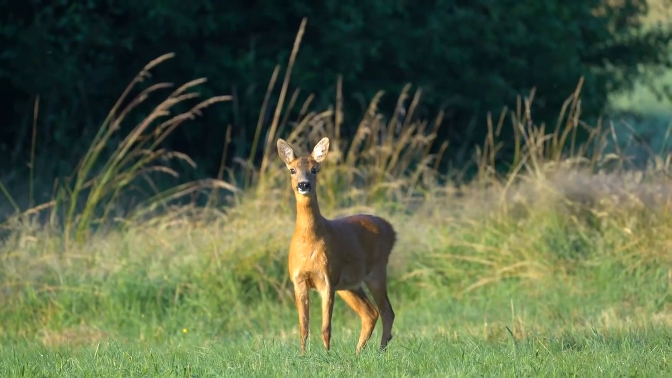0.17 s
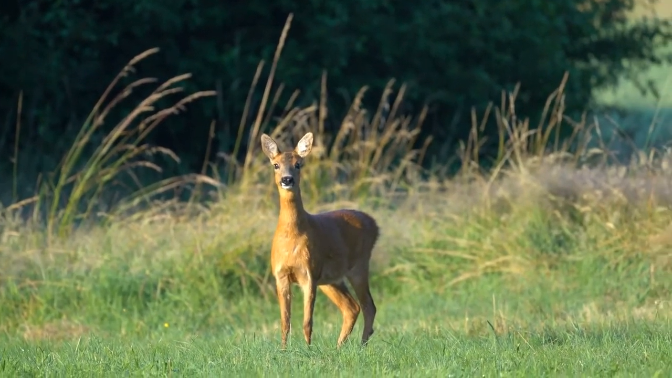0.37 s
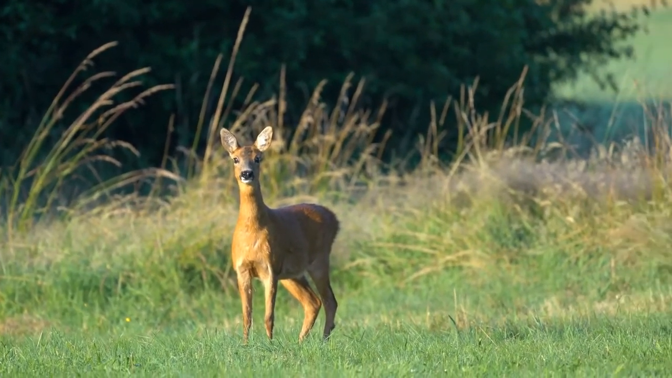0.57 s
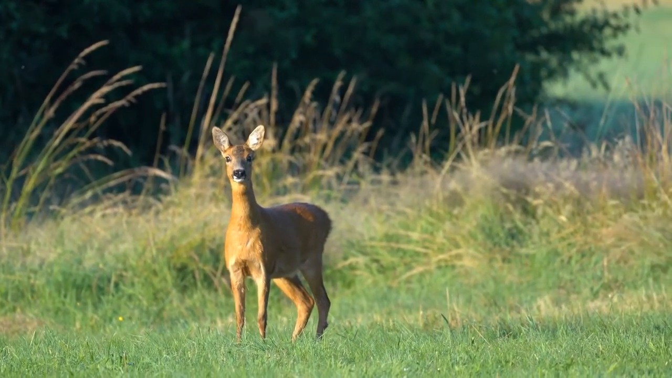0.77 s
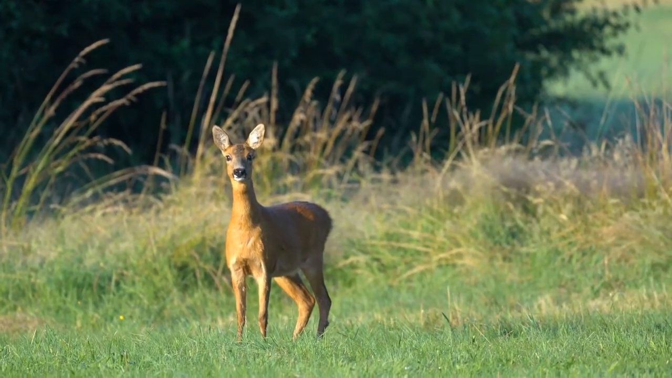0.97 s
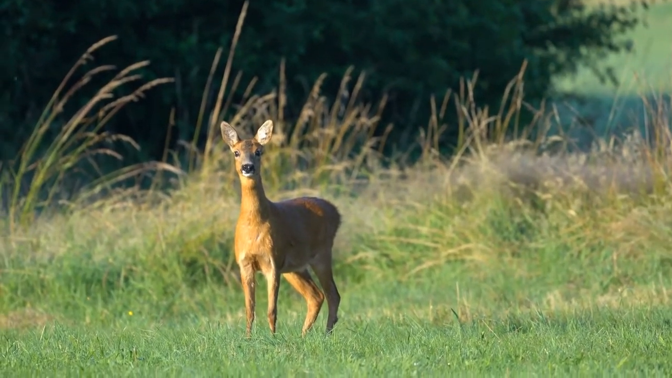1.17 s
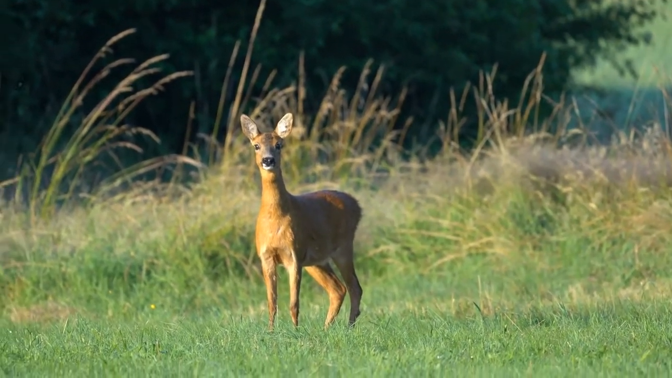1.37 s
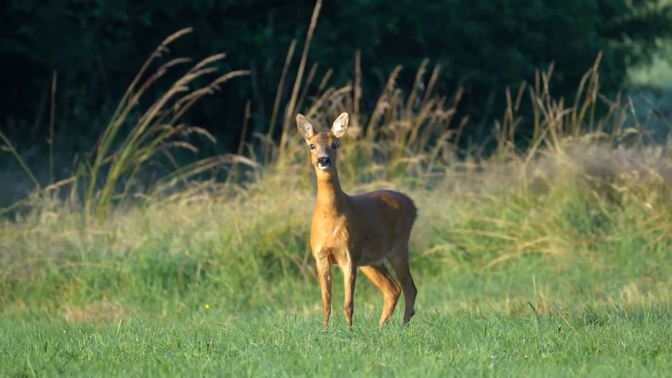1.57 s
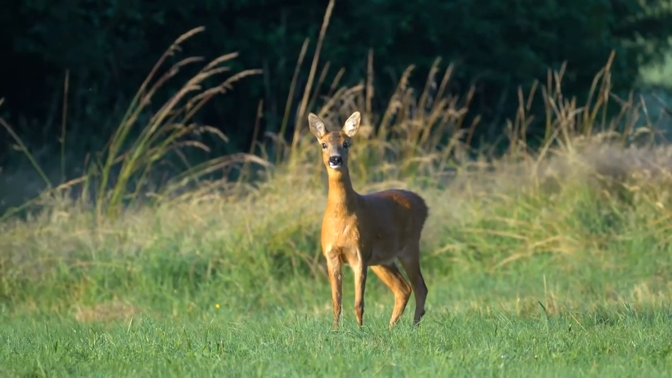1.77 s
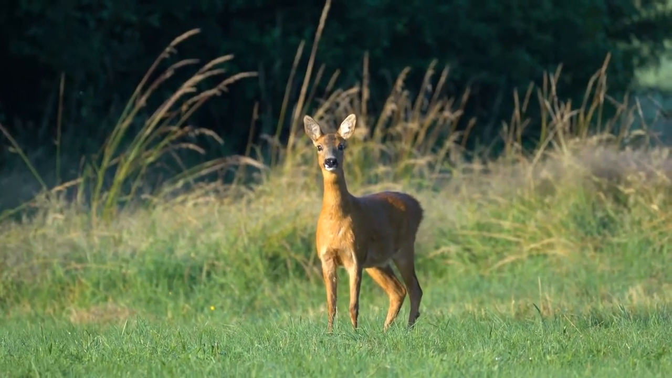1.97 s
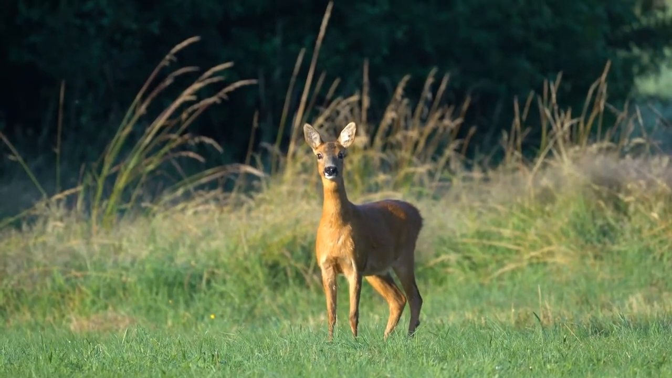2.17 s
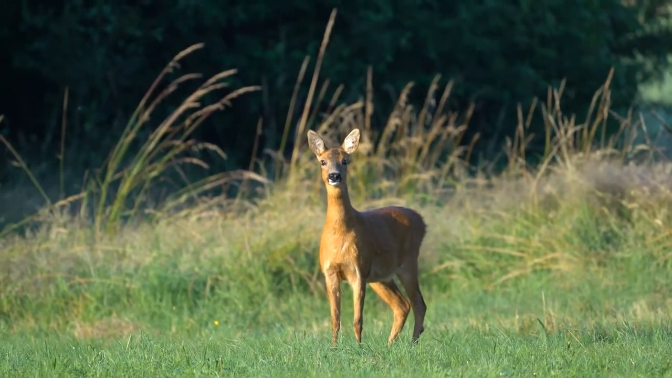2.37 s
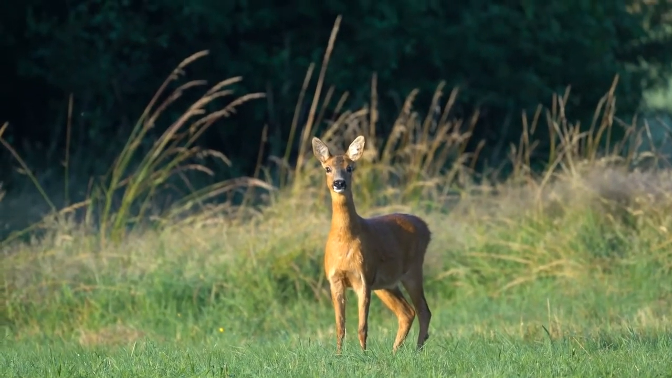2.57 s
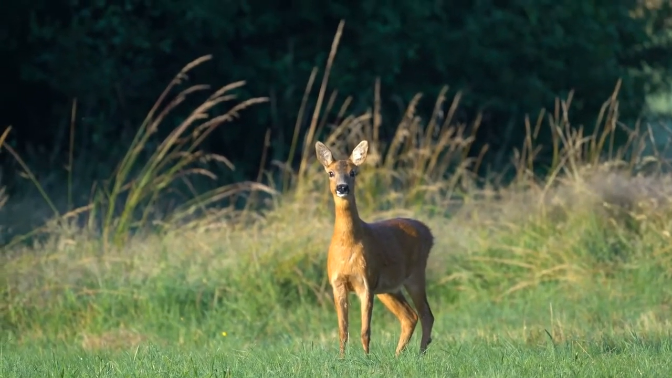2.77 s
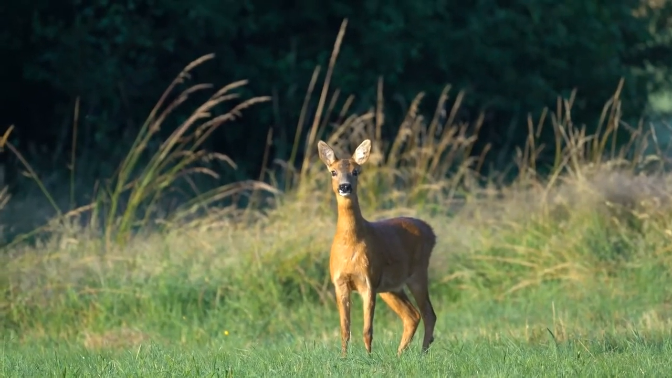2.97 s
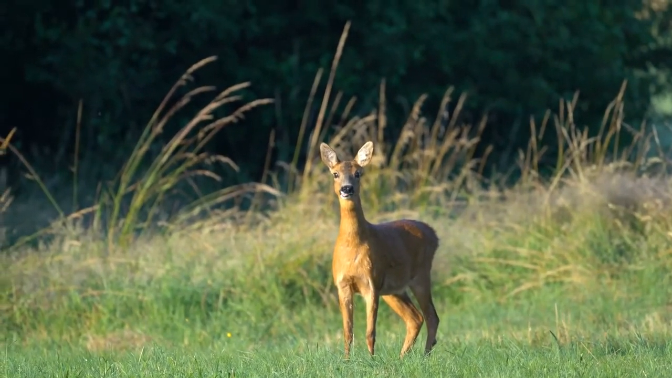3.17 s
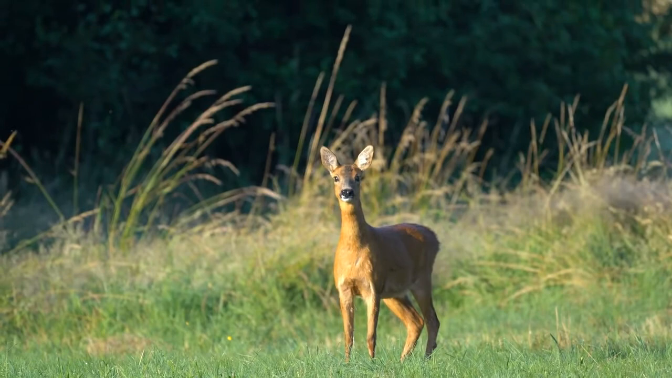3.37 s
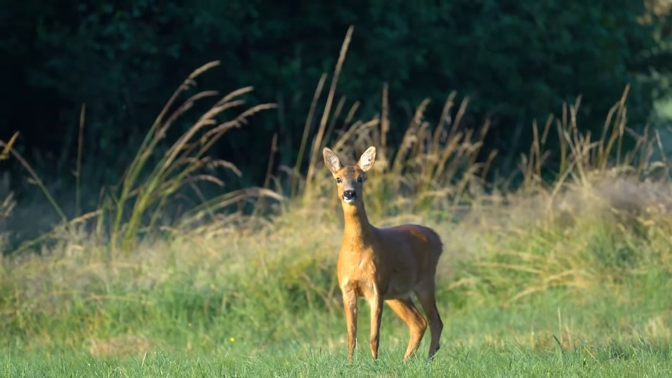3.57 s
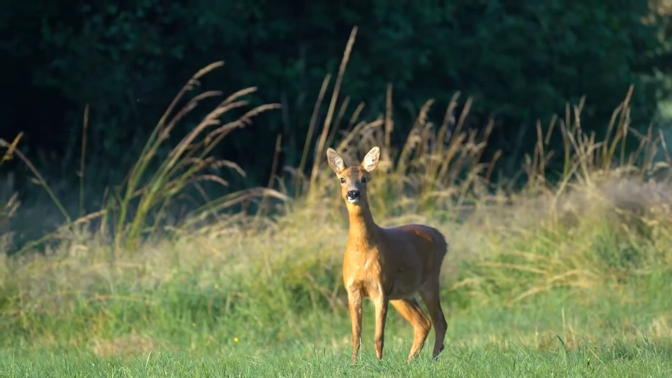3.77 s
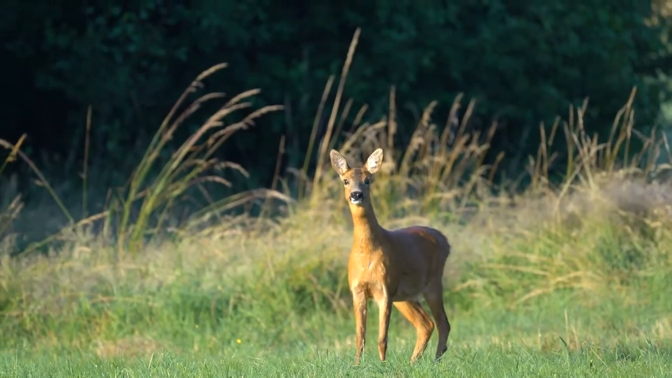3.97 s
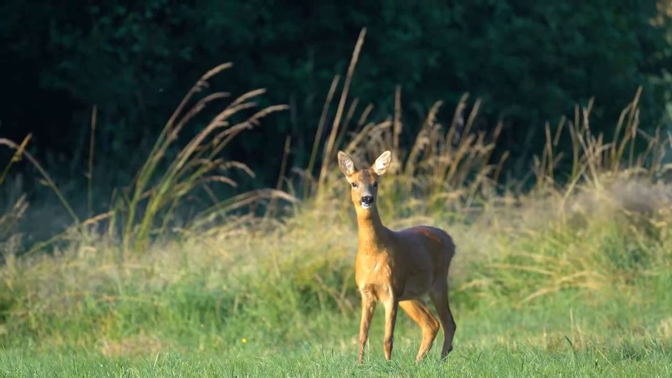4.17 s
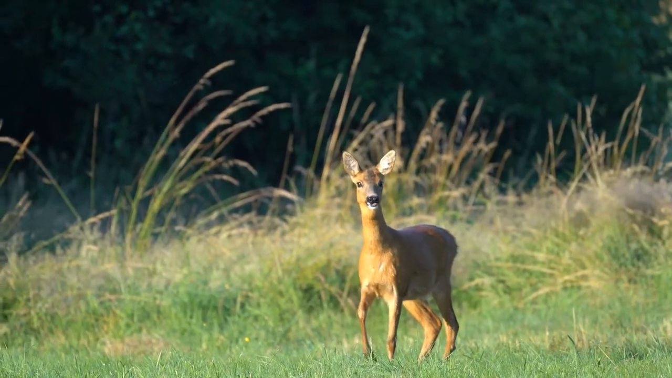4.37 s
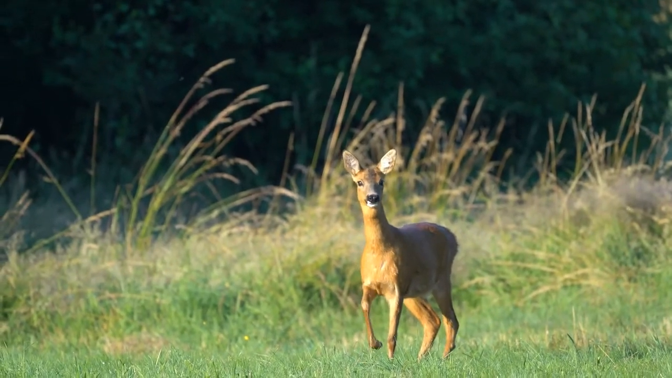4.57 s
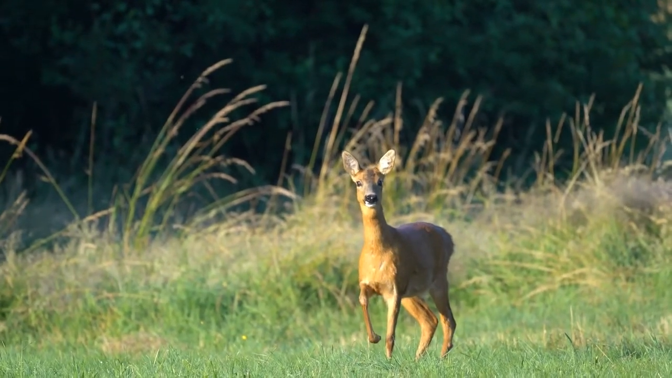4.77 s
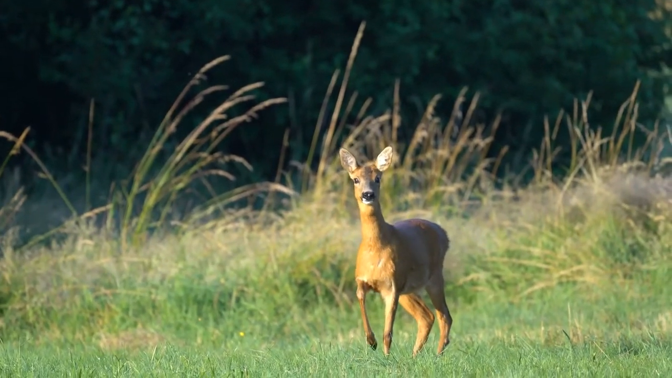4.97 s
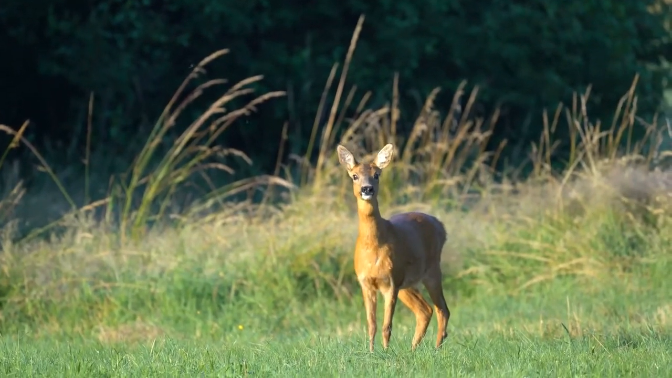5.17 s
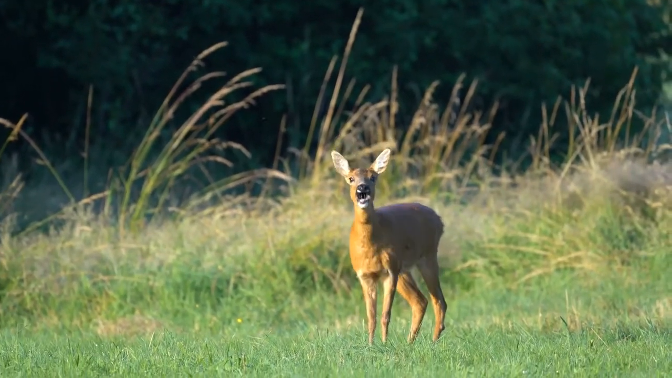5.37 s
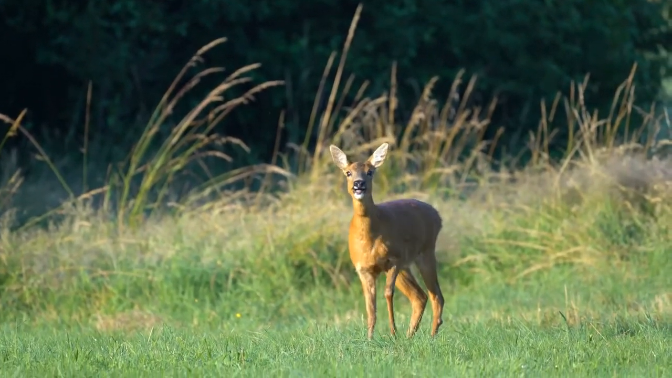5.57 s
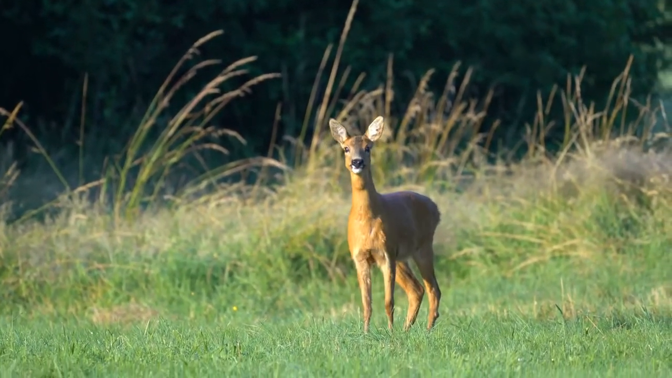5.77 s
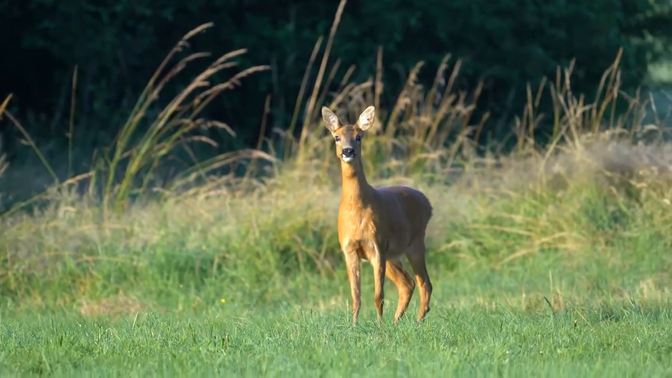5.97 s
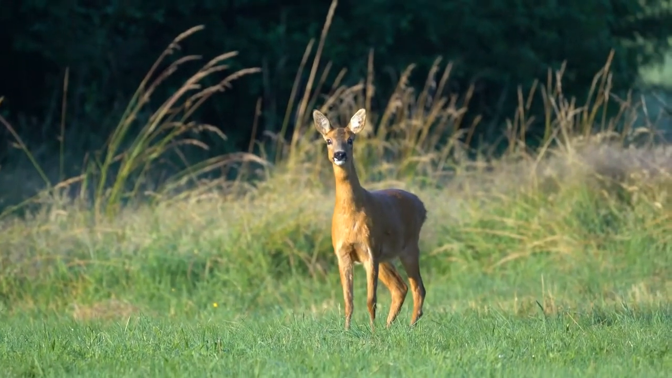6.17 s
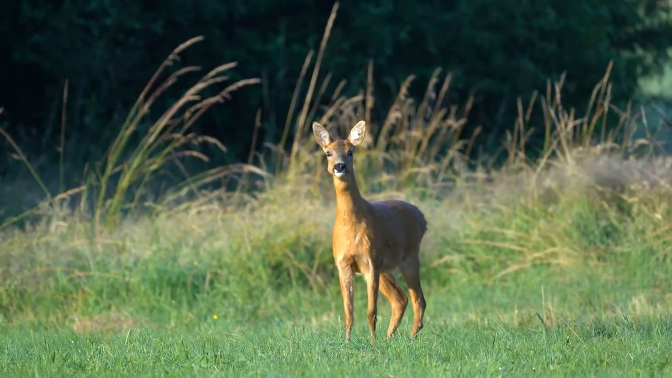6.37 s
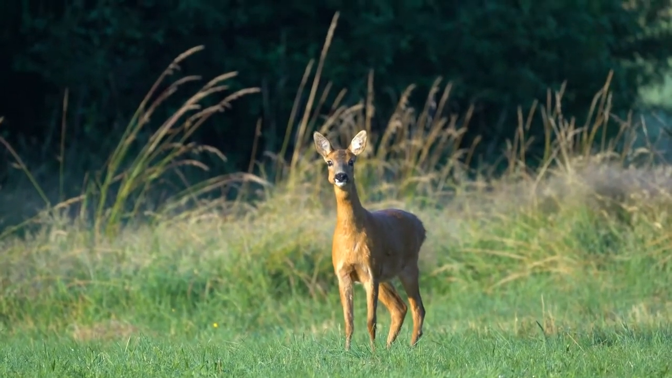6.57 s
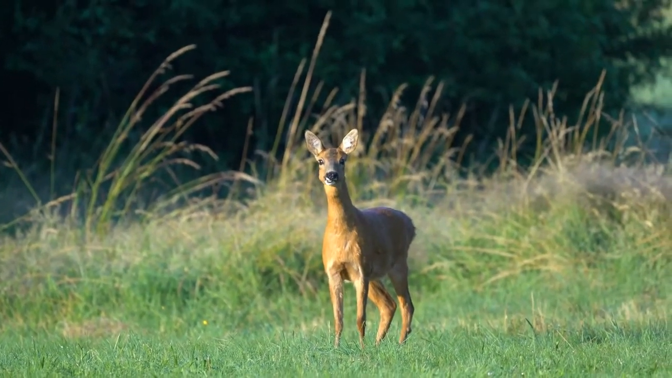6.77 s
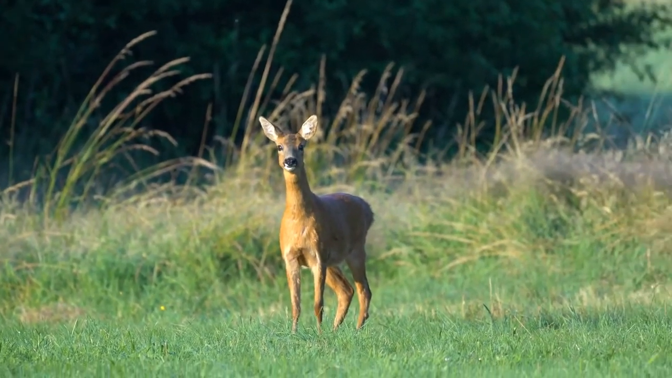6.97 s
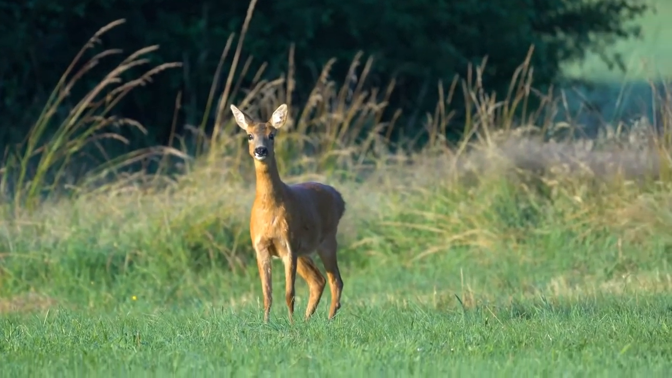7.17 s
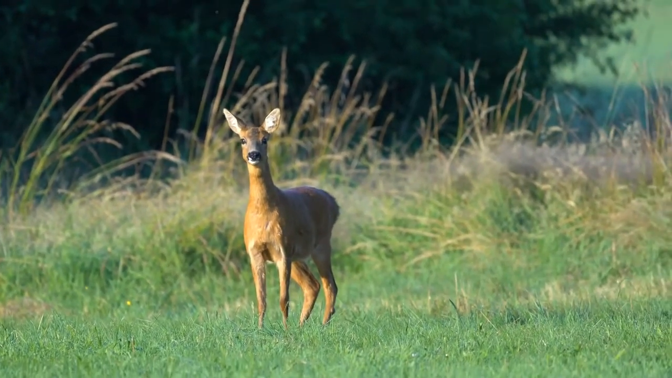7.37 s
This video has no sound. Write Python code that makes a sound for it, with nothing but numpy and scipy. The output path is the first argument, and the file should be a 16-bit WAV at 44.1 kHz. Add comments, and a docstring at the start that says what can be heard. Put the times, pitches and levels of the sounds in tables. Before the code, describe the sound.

Outdoor stereo ambience, very low in level: gentle hush, hiss and small scattered bird whistles from both sides, gathering into a faint twitter before falling nearly silent. Past the middle, one loud, hoarse deer bark, about a quarter second long, bursts out at moderate distance, followed by a hazy woodland reverberation. Brief bird peeps return, and a bright plastic click sounds near the microphone close to the end.

```python
"""Distant songbirds warble and chirp harshly over a soft rural hush, then a roe deer barks once in the meadow.
The bark is a train of uneven fold pulses and rasping air, coloured by throat resonances.
The tree line returns it as decaying scattered noise for about a second.
Songbirds are gliding sines; a far dove-like tone is a wavering sine and a far hum is resonant noise.
Ticks close to the microphone are clicks ringing a small plastic body."""
import sys
import numpy as np
from scipy import signal
from scipy.io import wavfile

SR = 44100
rng = np.random.default_rng(int(sys.argv[2]) if len(sys.argv) > 2 else 0)


def dump_mix(stems):
    """Bounce the given channels to the path in sys.argv[1] as a 16-bit WAV at rate SR."""
    frames = np.atleast_2d(stems).T  # one column per channel
    limited = np.clip(frames, -1, 1)  # hard clip at full scale
    pcm = np.round(limited * 32767).astype(np.int16)
    wavfile.write(sys.argv[1], SR, pcm)


N = 326781

# Hush of the meadow. Each row: time in seconds, level of the lower hush in dB, level of the upper hush in dB.
HUSH_LEVELS = [(0, -71.5, -75), (.5, -70.5, -69.5), (2.1, -69, -69), (2.5, -65.5, -65), (2.8, -70, -66),
               (3.8, -68, -66), (4.6, -69, -72.5), (4.8, -70, -71), (5.5, -69, -71.5), (6.5, -68.5, -68.5),
               (7.41, -66.5, -71.5)]
# Spectral shapes of the lower hush, the upper hush and the microphone's own hiss.
# Each row: frequency in Hz, relative density in dB per Hz.
HUSH_LOW = [(15, -54), (25, -32), (70, -14), (182, -15), (439, -5), (492, -3), (840, -4.5), (1040, -3.5),
            (1140, -3), (2400, -8.5), (3120, -16), (5280, -120)]
HUSH_HIGH = [(1120, -47), (1900, -4.5), (2820, 4), (5600, -6.5), (7280, -21), (12300, -120)]
HISS_SPECTRUM = [(3290, -24), (5600, -3), (7010, -1.5), (12800, -3.5), (15700, -3.5)]
HISS_DB = -67.5
# Stereo coherence of hush and hiss. Each row: frequency in Hz, left-right likeness (a correlation).
HUSH_LIKENESS = [(60, .9), (130, 0.63), (290, 0.77), (640, 0.26), (1100, 0.066), (3100, -0.45), (5000, 0.1),
                 (6300, 1)]

# A narrow band of far hum; the width is that of each of two passes through the resonance.
DRONE_HZ, DRONE_WIDTH_HZ, DRONE_DB = 1029.4, 42, -81
# The far low tone. Each row: time in seconds, frequency in Hz, level in dB.
COO = [(0.0, 504.3, -90), (1.41, 491.5, -73), (2.35, 494, -91.5), (3.35, 473.7, -73.5), (5.4, 474, -84.5)]

# Ticks near the microphone. Each row: start in seconds, peak in dB, treble over body in dB,
# left minus right in dB.
TICKS = [(0.427, -52, -10, 13), (1.866, -48, -6, -7), (2.023, -49, 3, -7.0), (2.145, -49, 7, -10),
         (2.186, -49, -3, 19), (2.236, -48.5, -1, -13), (3.005, -41, 13, 8), (6.9973, -28, 4, 2),
         (7.316, -46, -10, -8)]
# Resonances of the small body and of its sharp edge. Each row: frequency in Hz, t60 in seconds, level in dB.
TICK_BODY = [(1060, .012, -1), (1930, 0.0098, 12.5), (3300, 0.0031, 10)]
TICK_EDGE = [(5400, 0.0033, -4), (7150, 0.0027, -8), (9460, 0.0024, -8), (12900, 0.0015, -12)]

# Whistled notes. Each row: perch, start in seconds, length in seconds, start, middle and end frequency in Hz,
# level in dB.
NOTES = [("ahead", 0.536, 0.04, 4700, 4300, 2850, -62), ("ahead", 0.568, 0.025, 2850, 2700, 2500, -59),
         ("ahead", 0.706, 0.005, 2700, 2100, 1650, -61), ("left", 0.808, 0.06, 3250, 3330, 3600, -63),
         ("ahead", 1.036, 0.045, 3640, 3740, 3760, -60.5), ("right", 1.522, 0.079, 2510, 2540, 2430, -66),
         ("right", 1.641, 0.043, 2140, 2043, 1900, -65.5), ("left", 1.837, 0.013, 4600, 5400, 6400, -60),
         ("left", 1.857, 0.026, 4600, 4960, 4710, -50), ("right", 1.948, 0.054, 3150, 3300, 3540, -66),
         ("right", 2.003, 0.08, 2500, 2776, 2160, -54), ("left", 2.09, 0.055, 3750, 3600, 3480, -62),
         ("right", 2.157, 0.028, 2250, 2330, 2480, -62.5), ("right", 2.196, 0.035, 2180, 2490, 2570, -60),
         ("right", 2.284, 0.022, 2820, 2710, 2300, -56), ("right", 2.307, 0.033, 2430, 2170, 2140, -61.5),
         ("right", 2.46, 0.068, 2320, 2640, 2740, -58), ("left", 2.505, 0.028, 3400, 3600, 3800, -65),
         ("left", 2.538, 0.018, 3590, 3640, 3600, -61), ("right", 2.569, 0.04, 2750, 2130, 2070, -62.5),
         ("left", 2.59, 0.06, 4450, 3980, 3700, -64), ("left", 2.69, 0.028, 3800, 3650, 3500, -66),
         ("ahead", 2.61, 0.036, 8400, 8150, 7950, -67), ("right", 2.735, 0.06, 5300, 5950, 5750, -60),
         ("ahead", 2.747, 0.074, 5000, 5030, 4600, -60), ("right", 2.749, 0.111, 4450, 4070, 3650, -65),
         ("ahead", 2.855, 0.035, 3480, 3330, 3200, -60), ("left", 2.895, 0.075, 3250, 3640, 3450, -61),
         ("ahead", 3.018, 0.045, 3800, 3950, 3750, -57), ("right", 3.025, 0.05, 3900, 3100, 2600, -58),
         ("right", 3.112, 0.016, 2960, 2690, 2300, -60), ("right", 3.152, 0.0312, 2130, 2780, 3500, -56.5),
         ("ahead", 3.217, 0.028, 4010, 3800, 3660, -59), ("right", 3.24, 0.044, 2120, 1950, 1850, -68.5),
         ("right", 3.274, 0.047, 3190, 3250, 3500, -66), ("right", 3.381, 0.033, 3300, 3740, 3800, -67),
         ("left", 3.442, 0.02, 4870, 4840, 4740, -68), ("right", 3.412, 0.07, 1850, 2100, 2050, -65.5),
         ("right", 3.53, 0.023, 2900, 2670, 2350, -58.5), ("right", 3.55, 0.09, 1960, 1950, 1800, -69),
         ("ahead", 3.645, 0.038, 3720, 3200, 2650, -60.5), ("right", 3.651, 0.056, 2410, 2420, 2430, -65),
         ("right", 3.744, 0.048, 3560, 3530, 3520, -68), ("right", 4.23, 0.17, 1800, 2100, 2130, -69),
         ("right", 4.465, 0.12, 2500, 2300, 2000, -69), ("right", 4.262, 0.13, 2340, 2380, 2480, -67.5),
         ("left", 4.543, 0.089, 3320, 3000, 2980, -64.5), ("left", 4.748, 0.088, 3210, 2870, 2740, -64),
         ("ahead", 4.952, 0.025, 3750, 3600, 3300, -63), ("ahead", 5.25, 0.072, 3180, 3140, 3050, -61.5),
         ("left", 5.335, 0.022, 3450, 3500, 3500, -69), ("hedge", 6.152, 0.025, 2900, 2700, 2900, -59),
         ("near", 6.242, 0.024, 4450, 4700, 5900, -60), ("near", 6.267, 0.02, 5900, 5200, 4200, -53),
         ("left", 6.338, 0.006, 5100, 4850, 4600, -50), ("near", 6.485, 0.024, 5250, 5500, 5800, -60),
         ("near", 6.69, 0.012, 5150, 5000, 4750, -61), ]
# Where the songbirds sit. Each entry: perch, left minus right in dB.
PERCH_PAN_DB = {"left": 9, "ahead": 3, "right": -11, "near": 0, "hedge": -9}
# How strongly each singer's notes flutter. Each entry: perch, roughness factor.
PERCH_ROUGHNESS = {"left": 1, "ahead": 1.1, "right": 1.5, "near": 3.5, "hedge": 6}
# Harsh chirps. Each row: start in seconds, length in seconds, centre in Hz, level in dB.
CHIRPS = [(0.44, 0.047, 5520, -67), (0.64, 0.039, 4790, -62.5), (0.639, 0.023, 2020, -61),
          (0.748, 0.055, 4960, -60.5), (0.807, 0.039, 1980, -64), (1.129, 0.052, 5710, -64),
          (1.812, 0.042, 5300, -62.5), (3.69, 0.12, 7000, -67), (4.33, 0.22, 7000, -72),
          (6.352, 0.026, 5300, -55), (6.7, 0.022, 5300, -62)]
# The swing share scales the uneven whip of the pitch, relative to its centre.
CHIRP_SWEEPS_HZ, CHIRP_SWING_SHARE, CHIRP_SCRATCH_DB, CHIRP_PAN_DB = 68.75, .19, 5, -1
# Fainter warblers too far to follow. Each row: time in seconds, notes per second.
CHATTER_RATE = [(0, 2), (1.2, 8), (1.9, 16), (3.4, 42), (3.9, 25), (4.2, 3)]
CHATTER_DB = -74.5
LEAF_ECHO_DB, LEAF_T60_S = -6.5, .13
PORT_LAG_S = .00016  # birdsong reaches the left microphone port this much later

# The tree line's answer. Each row: frequency in Hz, level in dB.
WOODS_LEVEL = [(480, 4), (620, 13), (760, 8.5), (950, 10), (1380, 5.5), (1950, 1.5), (3000, 1), (6000, 2)]
# Its decay. Each row: frequency in Hz, t60 in seconds.
WOODS_T60 = [(700, 1.31), (1100, 1.1), (1340, 1.3), (1600, 0.75), (1950, .9), (3500, 0.5)]
# Its stereo coherence. Each row: frequency in Hz, left-right likeness (a correlation).
WOODS_LIKENESS = [(700, 0.87), (1200, 0.68), (2000, 0.38), (4000, .1)]
# Its side. Each row: frequency in Hz, left minus right in dB.
WOODS_PAN = [(700, 1.5), (1100, 6.5), (2000, 5.5), (4000, 1)]
WOODS_DELAY_S, WOODS_RISE_S = .014, .11
WOODS_PATCHY_DB = 1.5  # the answer comes in clumps
# One narrow band of the answer decays more slowly than the others.
LINGER_HZ, LINGER_WIDTH_HZ, LINGER_DB, LINGER_T60_S = 1375, 90, -9, 3.0

# The hardest slaps of the vocal folds, heard as crackle. Each row: time in seconds, peak in dB before radiation.
SLAPS = [(5.5028, -30), (5.5128, -23), (5.5188, -19), (5.5288, -19), (5.5487, -18), (5.5584, -15.5),
         (5.5633, -15), (5.5867, -15.5), (5.6101, -12.5), (5.6196, -17), (5.6248, -13), (5.6303, -16),
         (5.644, -15.5), (5.6495, -19), (5.6645, -21), (5.675, -18), (5.6874, -19)]
# Throat and mouth resonances. Each row: frequency in Hz, width in Hz, level in dB.
THROAT = [(655, 110, -13), (1315, 230, -3.5), (1930, 118, 4.5), (2720, 300, 0), (4400, 1100, -16.5),
          (5740, 730, -20.5), (9300, 1800, -26)]
# The mouth opens and closes, moving every resonance. Each row: time in seconds, factor on frequency.
MOUTH = [(5.49, .97), (5.55, 1.0), (5.61, 1.03), (5.65, .98), (5.71, .97)]
# Side of the bark. Each row: frequency in Hz, left minus right in dB.
BARK_PAN = [(700, 0), (1300, -4), (2400, -5.5), (8000, -14)]
FOLD_HZ, FOLD_JITTER, FOLD_SPREAD_DB = 200, .3, 2  # median pulse rate, spread of log period, spread of level
RASP_DB = 2.5
BARK_START_S, BARK_END_S, BARK_DB, SWELL_DB_PER_S = 5.486, 5.711, -33, 2
ATTACK_S, RELEASE_S, EDGE_DROP_DB = .014, .011, 30
# Under full effort each octave above 1.5 kHz loses this share of the level drop.
FULL_EFFORT_DB, BRIGHTEN = -31, .76
SLAP_DAMPING = 1.8  # the folds fly wide open after a slap, so the resonances widen by this factor

CUTOFF_HZ = 15800


def amp(db):
    """Logarithmic level: decibels become an amplitude ratio."""
    return 10 ** (np.asarray(db) / 20)


def pan_gains(left_minus_right_db):
    """Level difference between ears, shared equally by the two channels."""
    return amp([[left_minus_right_db / 2], [-left_minus_right_db / 2]])


def rms_one(x):
    """Power normalisation to unit rms."""
    return x / np.sqrt(np.mean(x ** 2) + 1e-20)


def in_time(rows):
    """Linear interpolation: table columns become curves, one value a sample."""
    s, *columns = np.transpose(rows)
    return [np.interp(np.arange(N) / SR, s, c) for c in columns]


def at_hz(points, hz):
    """Linear interpolation on a log-frequency axis."""
    table_hz, values = np.transpose(points)
    return np.interp(np.log(hz), np.log(table_hz), values)


def drift(rate, count=N):
    """Slow random modulation: normal points, two per cycle of rate in Hz, joined smoothly."""
    steps = np.arange(count) * 2 * rate / SR
    whole = steps.astype(int)
    points = rng.standard_normal(whole[-1] + 2)
    blend = .5 - .5 * np.cos(np.pi * (steps - whole))
    return points[whole] * (1 - blend) + points[whole + 1] * blend


def resonance(hz, t60):
    """Damped oscillator: two-pole coefficients whose click response is a decaying sine."""
    r, w = amp(-60 / (t60 * SR)), 2 * np.pi * hz / SR
    return [0, np.sin(w)], [1, -2 * r * np.cos(w), r * r]


def ring(x, hz, t60):
    """Free vibration: a unit click sets a decaying sine of starting height 1 ringing."""
    return signal.lfilter(*resonance(hz, t60), x + 1e-18)


def glide(x, hz, t60):
    """Time-varying resonance: its frequency is stepped in short blocks while its state carries on."""
    out, state = np.zeros(len(x)), np.zeros(2)
    for i in range(0, len(x), 128):
        out[i:i + 128], state = signal.lfilter(*resonance(hz[i], t60), x[i:i + 128], zi=state)
    return out


def bandpass(x, low_hz, high_hz):
    """Band limitation by a Butterworth filter."""
    return signal.sosfilt(signal.butter(2, [low_hz, high_hz], "band", fs=SR, output="sos"), x)


def highpass(x, order, hz):
    """Removal of bass by a Butterworth filter."""
    return signal.sosfilt(signal.butter(order, hz, "high", fs=SR, output="sos"), x)


def stereo(mid, side, alike):
    """Partial coherence: common and opposed noise give the ears a chosen correlation."""
    return np.sqrt((1 + alike) / 2) * mid + np.sqrt((1 - alike) / 2) * side * [[1], [-1]]


def add(out, s, sound, pan_db):
    """Superposition: a panned sound joins both channels from time s."""
    i = round(s * SR)
    out[:, i:i + len(sound)] += sound[:N - i] * pan_gains(pan_db)


def hush(spectrum, patchy_db):
    """Band-filtered noise: third octaves with own level, flicker and coherence; the ears' mean has rms 1."""
    out, white = 0, rng.standard_normal((2, 2, N))
    lowest_hz, highest_hz = spectrum[0][0], spectrum[-1][0]
    edges = lowest_hz * 2 ** np.arange(0, np.log2(highest_hz / lowest_hz) + .3, 1 / 3)
    for k, (low, high) in enumerate(zip(edges, edges[1:])):
        mid, side = bandpass(white[k % 2], low, high)  # neighbouring bands use separate noise
        hz = np.sqrt(low * high)
        alike = np.clip(at_hz(HUSH_LIKENESS, hz), -1, .99)
        gain = amp(at_hz(spectrum, hz) + patchy_db * drift(4.0))
        out = out + gain * stereo(mid, side, alike)
    return out / np.sqrt(np.mean(out.mean(0) ** 2))


def meadow():
    """Sum of incoherent noises: two hush bands change level slowly above the microphone's hiss."""
    low_db, high_db = in_time(HUSH_LEVELS)
    out = amp(low_db) * hush(HUSH_LOW, patchy_db=1.74)
    out += amp(high_db) * hush(HUSH_HIGH, patchy_db=2.0)
    return out + amp(HISS_DB + .7 * drift(9)) * hush(HISS_SPECTRUM, patchy_db=.6)


def drone():
    """Resonant filtering: noise passes one resonance twice, swells slowly and is partly coherent."""
    t60 = np.log(1000) / (np.pi * DRONE_WIDTH_HZ)
    mid, side = (rms_one(ring(ring(noise, DRONE_HZ, t60), DRONE_HZ, t60)) for noise in rng.standard_normal((2, N)))
    return amp(DRONE_DB + 2.0 * drift(1.3)) * (mid + .65 * side * [[1], [-1]])


def coo():
    """Frequency modulation: a far pure tone wavers in pitch and level and fades out."""
    hz, level_db = in_time(COO)
    fade = np.clip((COO[-1][0] - np.arange(N) / SR) / .19, 0, 1)
    phase = 2 * np.pi * np.cumsum(hz + 3.18 * drift(8.0)) / SR
    return np.sqrt(2) * fade * amp(level_db + drift(5.0)) * np.sin(phase)


def ticks():
    """Impulse excitation: a click in a short crunch rings the edge first, the plastic body just after."""
    out = np.zeros((2, N))
    for s, peak_db, treble_db, pan_db in TICKS:
        crunch = np.r_[.15 * rng.standard_normal(120) * np.hanning(120), np.zeros(900)]
        crunch[70] = 1
        later = np.roll(crunch, 55)
        edge = sum(amp(db) * ring(crunch, hz, t60) for hz, t60, db in TICK_EDGE)
        body = 0
        for hz, t60, db in TICK_BODY:
            tilt_db = treble_db * np.log2(hz / TICK_BODY[1][0])
            body = body + amp(db + tilt_db) * ring(later, hz, t60)
        tick = amp(treble_db / 2) * rms_one(edge) + amp(-treble_db / 2) * rms_one(body)
        tick = highpass(tick, 3, 950)  # too small for bass
        add(out, s, amp(peak_db) * tick / np.abs(tick).max(), pan_db)
    return out


def whistle(hz, level_db, rough=1):
    """Phase integration: a sine follows a pitch curve; moving air makes level and pitch flutter."""
    count = len(hz)
    shape = np.sin(np.linspace(0, np.pi, count)) ** .6
    shape = shape * amp(3 * np.sqrt(rough) * drift(90, count))
    flutter_hz = 35 * rough * drift(140, count)
    return np.sqrt(2) * amp(level_db) * shape * np.sin(2 * np.pi * np.cumsum(hz + flutter_hz) / SR)


def add_chatter(out):
    """Random point process: short slurs start between 1.8 and 5 kHz on all sides."""
    when = np.arange(0, N / SR - .1, .01)
    chance = rng.random((len(when), 6))
    sung = chance[:, 0] < .01 * np.interp(when, *np.transpose(CHATTER_RATE))
    for s, (_, pitch, slur, length, level, side) in zip(when[sung], chance[sung]):
        count = round((.02 + .05 * length) * SR)
        hz = 1800 * 2.8 ** pitch * np.linspace(1, .75 + .4 * slur, count)
        add(out, s, whistle(hz, CHATTER_DB + 10.4 * (level - .5)), 24 * (side - .5))


def add_notes(out):
    """Frequency glide: each whistle follows a parabola through three pitches."""
    for perch, s, length, start_hz, middle_hz, end_hz, level_db in NOTES:
        arc = np.polyfit([0, .5, 1], [start_hz, middle_hz, end_hz], 2)
        # 4 ms more at each end leave room for the fades
        hz = np.polyval(arc, np.linspace(0, 1, round((length + .008) * SR)))
        add(out, s - .004, whistle(hz, level_db, PERCH_ROUGHNESS[perch]), PERCH_PAN_DB[perch])


def add_chirps(out):
    """Fast frequency modulation: the pitch whips up and down so unevenly that it buzzes."""
    for s, length, centre_hz, level_db in CHIRPS:
        t = np.arange(round(length * SR)) / SR
        whip = .717 * np.cos(2 * np.pi * CHIRP_SWEEPS_HZ * (t - length / 2)) + .42 * drift(298.5, len(t))
        hz = centre_hz * (1 + CHIRP_SWING_SHARE * whip)
        add(out, s, whistle(hz, level_db + CHIRP_SCRATCH_DB * drift(500, len(t))), CHIRP_PAN_DB)


def birds():
    """Diffuse scattering: leaves blur the song by decaying noise; the left port hears it late."""
    out = np.zeros((2, N))
    add_notes(out)
    add_chirps(out)
    add_chatter(out)
    t = np.arange(SR // 2) / SR
    leaves = rng.standard_normal((2, len(t))) * amp(-60 * t / LEAF_T60_S)
    leaves *= amp(LEAF_ECHO_DB) / np.sqrt(np.sum(leaves ** 2) / 2)
    song = out + signal.fftconvolve(out, leaves, axes=1)[:, :N]
    lag = round(PORT_LAG_S * SR)
    song[0] = np.r_[np.zeros(lag), song[0, :N - lag]]
    return song


def woods(voice):
    """Multiple scattering: countless trunks answer with noise that dies band by band."""
    t = np.arange(2 * SR) / SR
    white, answer = rng.standard_normal((2, len(t))), 0
    for hz in 500 * 2 ** np.arange(0, 4.1, .25):
        mid, side = bandpass(white, hz / 2 ** .125, hz * 2 ** .125)
        alike = np.clip(at_hz(WOODS_LIKENESS, hz), 0, 1)
        band = stereo(mid, side, alike) * pan_gains(at_hz(WOODS_PAN, hz))
        decay_db = at_hz(WOODS_LEVEL, hz) - 60 * t / at_hz(WOODS_T60, hz)
        answer = answer + band * amp(WOODS_PATCHY_DB * drift(5, len(t)) + decay_db)
    linger = bandpass(white[::-1], LINGER_HZ - LINGER_WIDTH_HZ / 2, LINGER_HZ + LINGER_WIDTH_HZ / 2)
    answer = answer + linger * amp(LINGER_DB - 60 * t / LINGER_T60_S)
    answer *= np.clip((t - WOODS_DELAY_S) / WOODS_RISE_S, 0, 1) / np.sqrt(SR / 10)
    echoes = signal.fftconvolve(answer, voice.mean(0)[None], axes=1)
    # moving air and leaves stretch the paths a little, which blurs the pitch of the tail
    at = np.arange(echoes.shape[1])
    stretched = at + .0003 * SR * drift(12, len(at))
    return np.array([np.interp(stretched, at, ear) for ear in echoes])


def fold_pulses(count):
    """Irregular periodic excitation: fold pulses vary in spacing and level, and weaken near each slap."""
    chance = rng.standard_normal((80, 2))
    at = np.cumsum(SR / FOLD_HZ * np.exp(FOLD_JITTER * chance[:, 0])).astype(int)
    pulses = np.zeros(count)
    pulses[at[at < count]] = amp(FOLD_SPREAD_DB * chance[at < count, 1])
    for s, _ in SLAPS:
        i = round((s - BARK_START_S) * SR)
        pulses[i - 80:i + 140] *= .5
    return pulses


def throat(x, mouth, drop_db=0, damping=1):
    """Source-filter principle: parallel resonances of alternating sign; a weak push is duller."""
    streams = []
    for k, (hz, width, db) in enumerate(THROAT):
        push = x * amp(BRIGHTEN * drop_db * max(np.log2(hz / 1500), 0))
        t60 = np.log(1000) / (np.pi * width * damping)
        streams.append((-1) ** k * amp(db) * width * glide(push, hz * mouth, t60))
    return streams


def bark():
    """Voiced and turbulent excitation: fold pulses, rasp and slaps drive the throat; gives a dry stereo voice."""
    count = round((BARK_END_S - BARK_START_S + .02) * SR)
    t = np.arange(count) / SR
    mouth = np.interp(BARK_START_S + t, *np.transpose(MOUTH))
    edges = np.exp(-t / ATTACK_S) + np.exp((BARK_START_S + t - BARK_END_S) / RELEASE_S)
    level_db = BARK_DB + SWELL_DB_PER_S * t - EDGE_DROP_DB * edges

    pulses = fold_pulses(count)
    # air rushes for a few ms after each opening
    puffs = signal.lfilter([1], [1, -np.exp(-1 / (.007 * SR))], pulses) * rng.standard_normal(count)
    # folds of flesh close softly, so the pulses are duller than the rasp
    soft = np.hanning(7)
    source = rms_one(np.convolve(pulses, soft, "same")) / 2 + amp(RASP_DB) * rms_one(puffs)
    source *= amp(level_db) / np.std(sum(throat(source, mouth)))

    slaps = np.zeros(count)
    for s, peak_db in SLAPS:
        slaps[round((s - BARK_START_S + .0007) * SR)] = amp(peak_db)
    click_response = sum(throat(np.eye(1, 400)[0], mouth, damping=SLAP_DAMPING))
    slaps /= np.abs(click_response).max()
    slaps = np.convolve(slaps, soft / soft.sum(), "same")

    drop_db = level_db - FULL_EFFORT_DB
    streams = np.add(throat(source, mouth, drop_db), throat(slaps, mouth, drop_db, SLAP_DAMPING))
    pans = at_hz(BARK_PAN, np.array(THROAT)[:, 0])
    voice = sum(band * pan_gains(pan) for band, pan in zip(streams, pans))
    # each resonance's skirt is dulled by distance
    voice = signal.sosfilt(signal.butter(2, 7000, fs=SR, output="sos"), voice)
    voice = signal.lfilter(*signal.iirnotch(860, 4.0, fs=SR), voice)  # the nasal side branch traps this band
    return highpass(voice, 6, 560)  # the small head radiates no bass


def scene():
    """Superposition of hush, hum, far tone, ticks, birds, bark and the tree line's answer."""
    out = meadow() + drone() + coo() + ticks() + birds()
    voice = bark()
    i = round(BARK_START_S * SR)
    out[:, i:i + voice.shape[1]] += voice
    out[:, i:] += woods(voice)[:, :N - i]
    return out


def record(dry):
    """Band limitation: a steep low-pass cuts the top."""
    return signal.sosfilt(signal.cheby2(16, 70, CUTOFF_HZ + 330, fs=SR, output="sos"), dry)


dry = scene()
out = record(dry)
dump_mix(out)
```